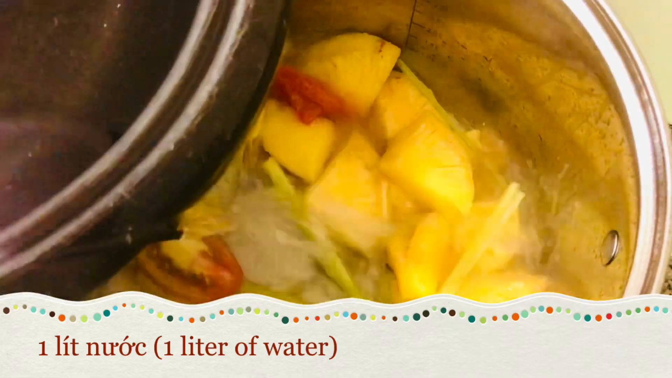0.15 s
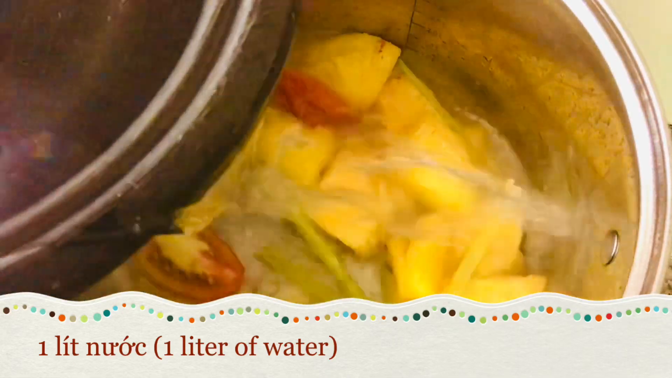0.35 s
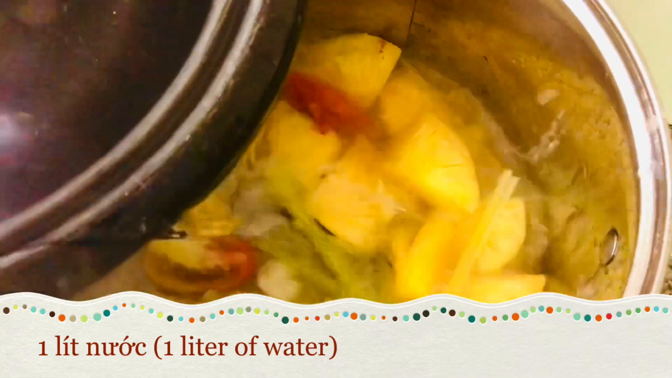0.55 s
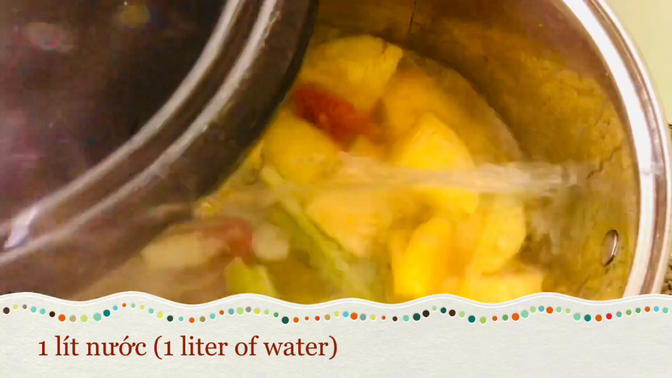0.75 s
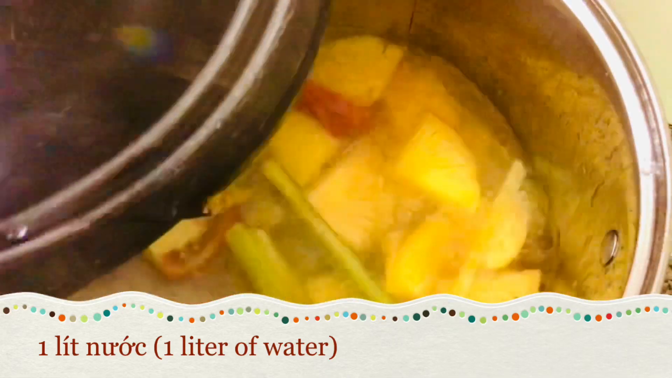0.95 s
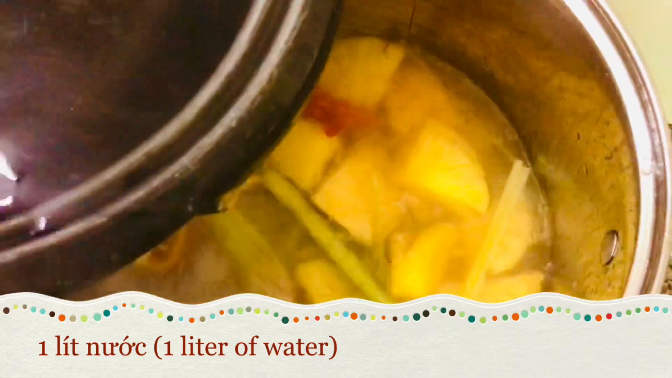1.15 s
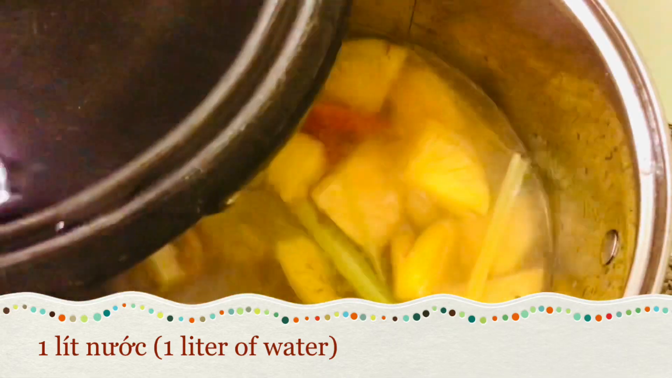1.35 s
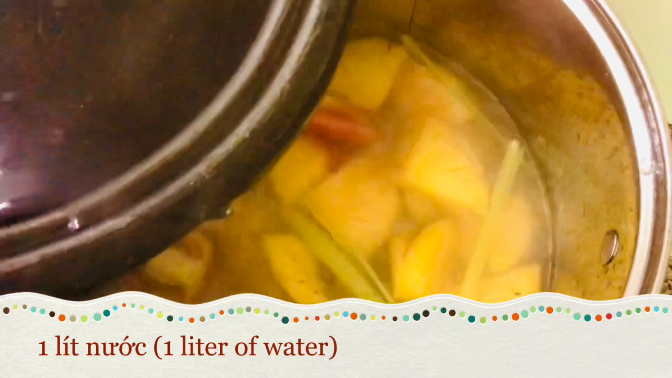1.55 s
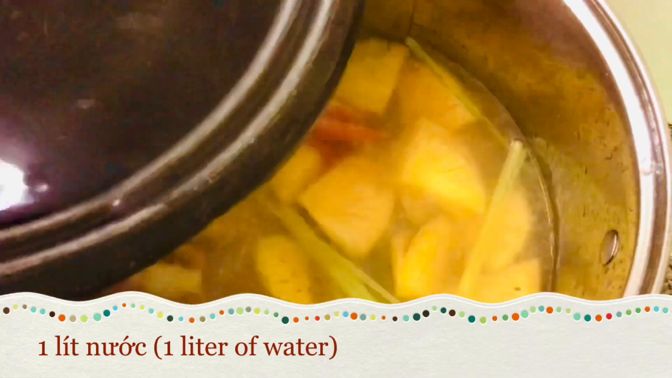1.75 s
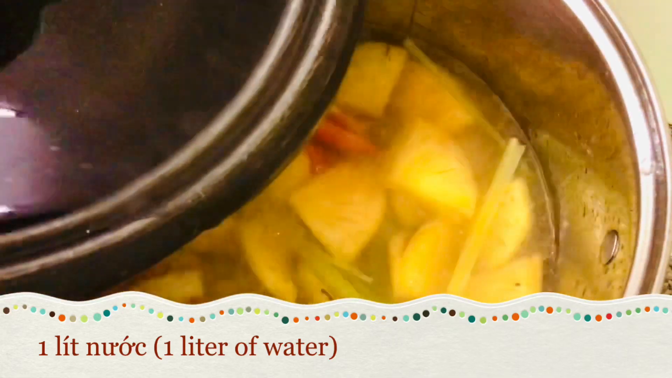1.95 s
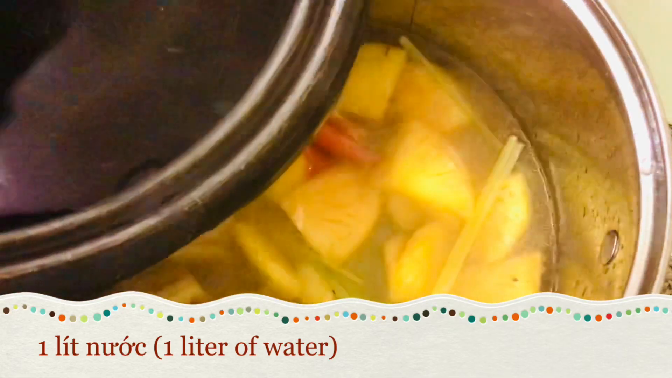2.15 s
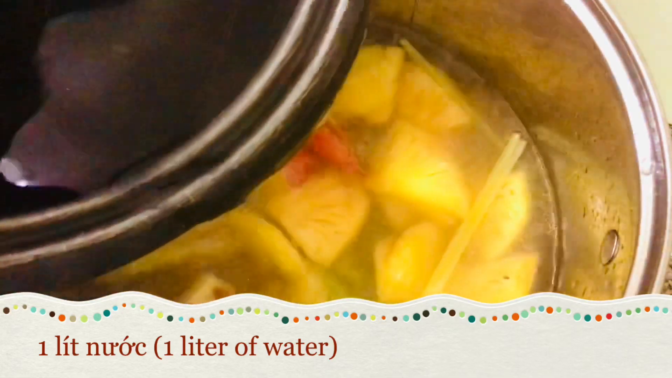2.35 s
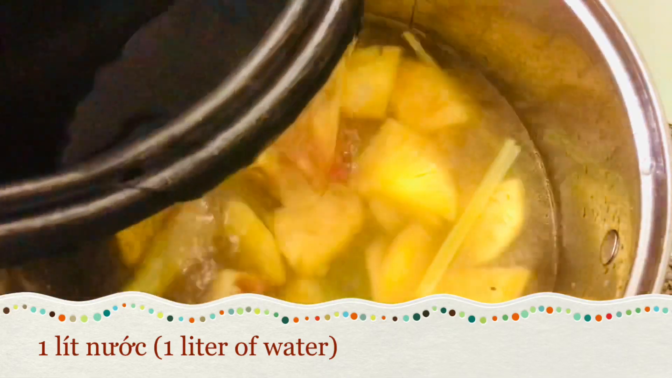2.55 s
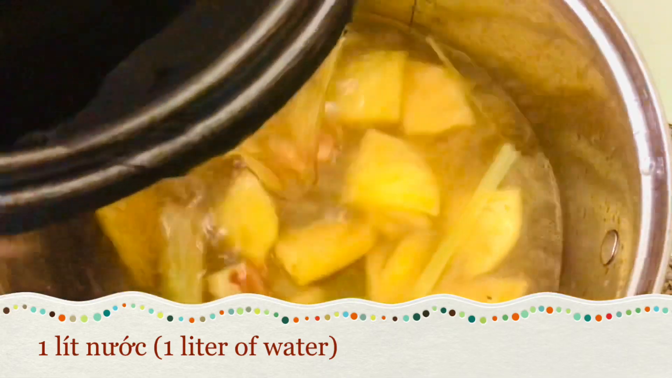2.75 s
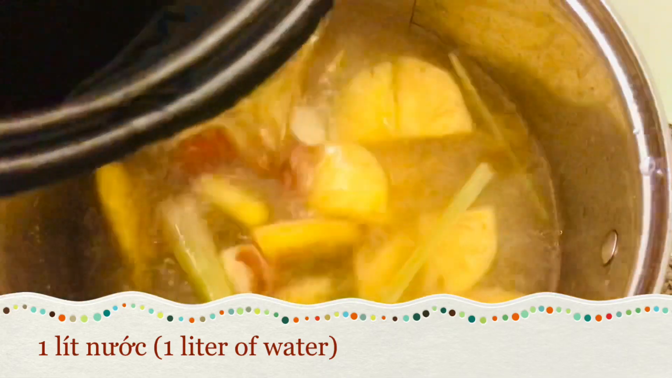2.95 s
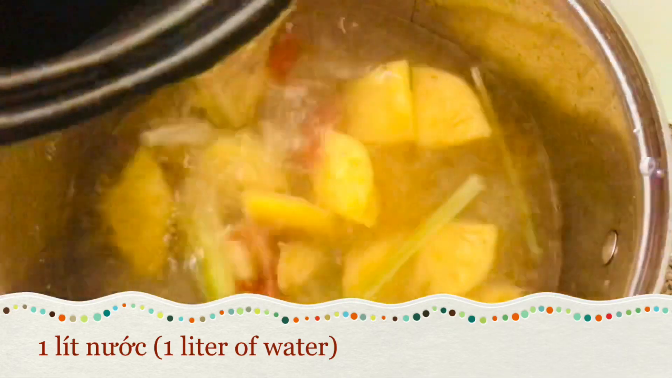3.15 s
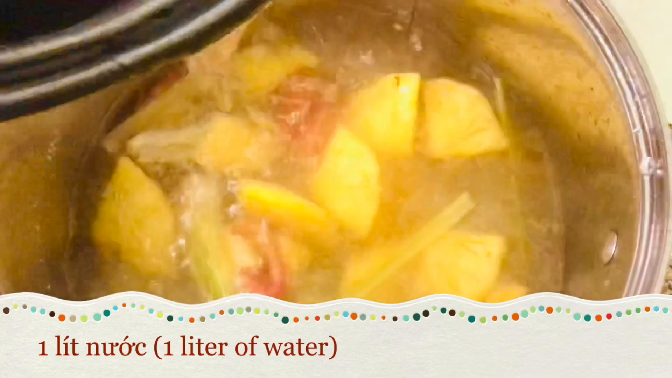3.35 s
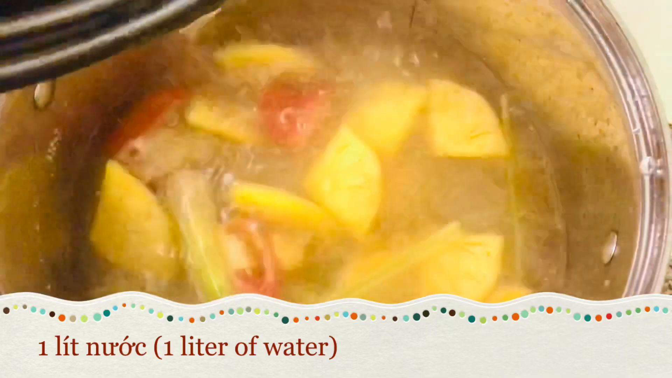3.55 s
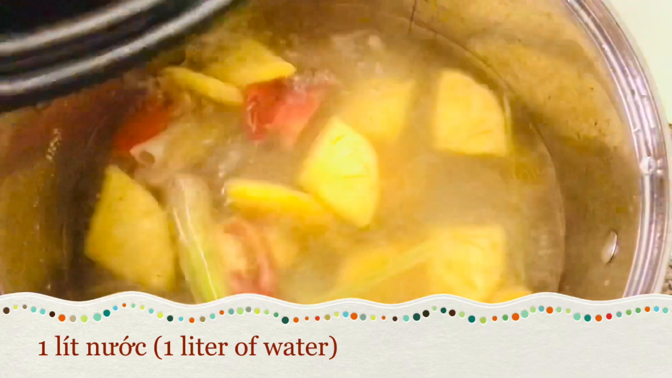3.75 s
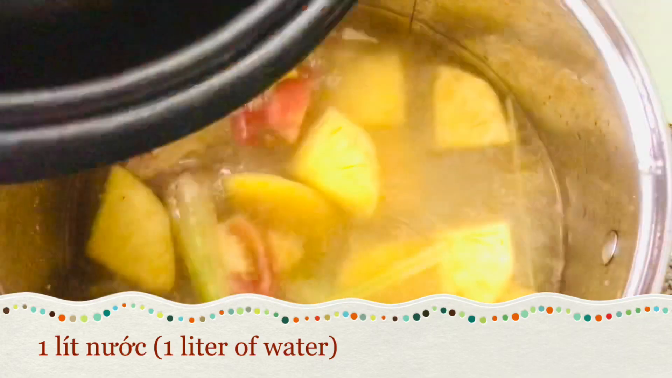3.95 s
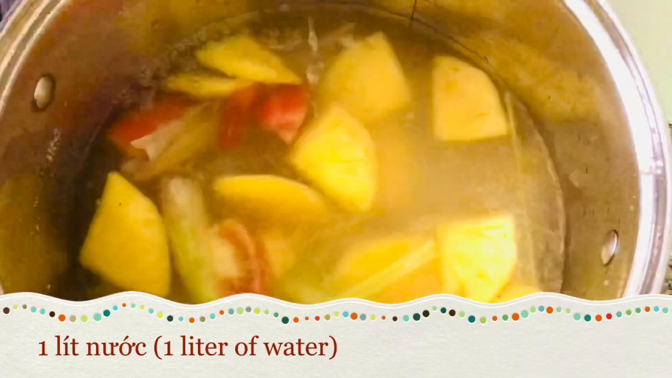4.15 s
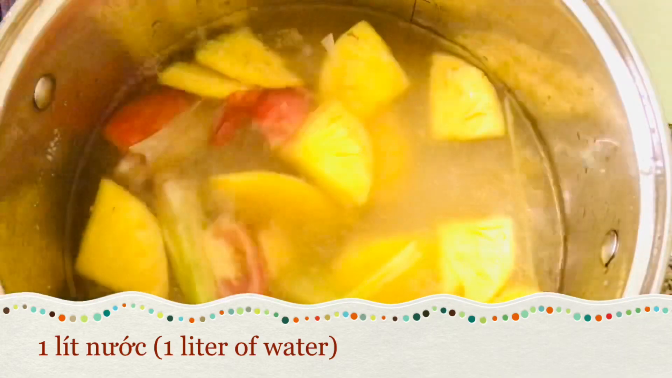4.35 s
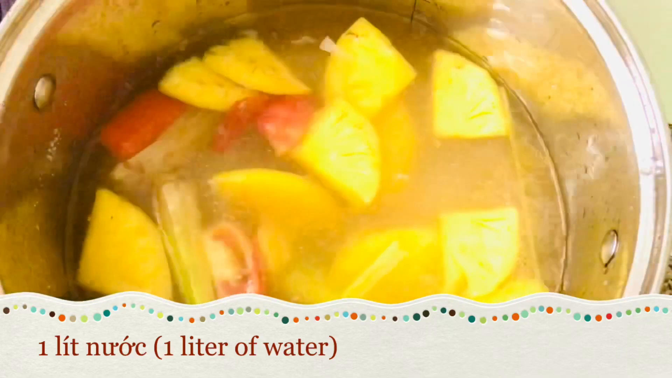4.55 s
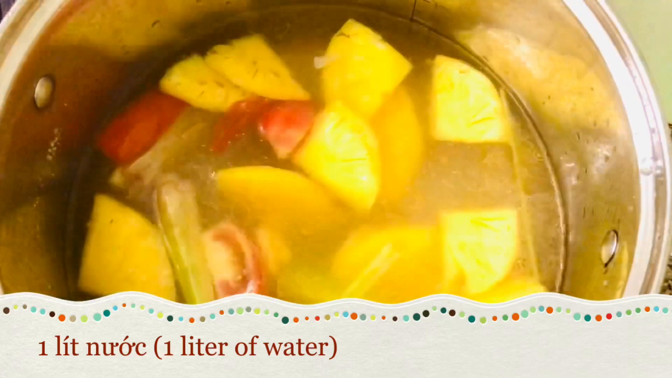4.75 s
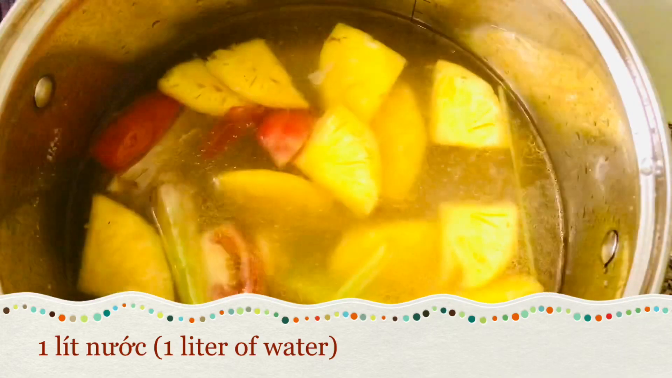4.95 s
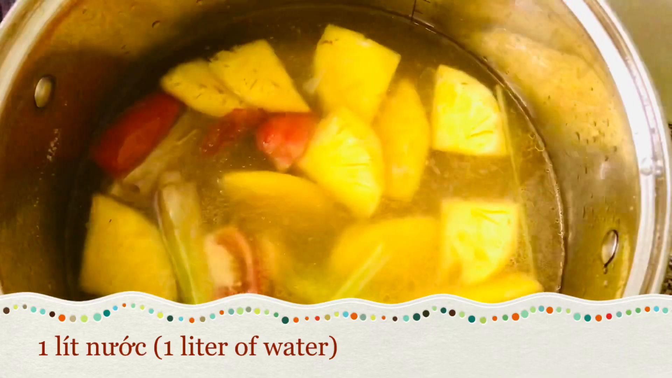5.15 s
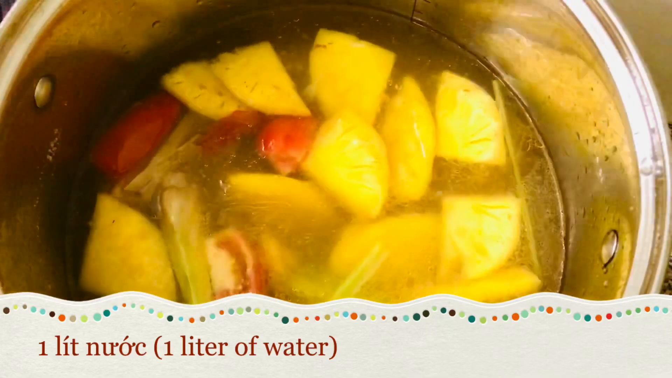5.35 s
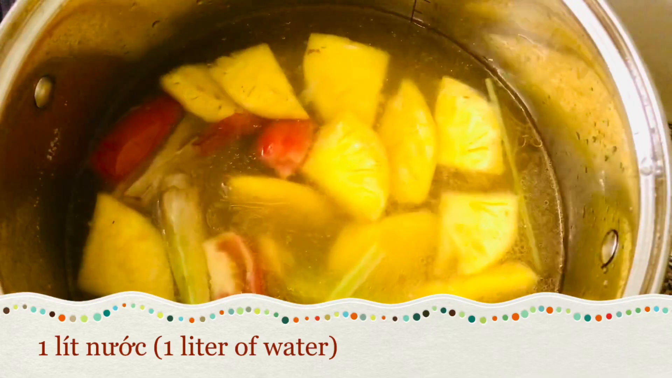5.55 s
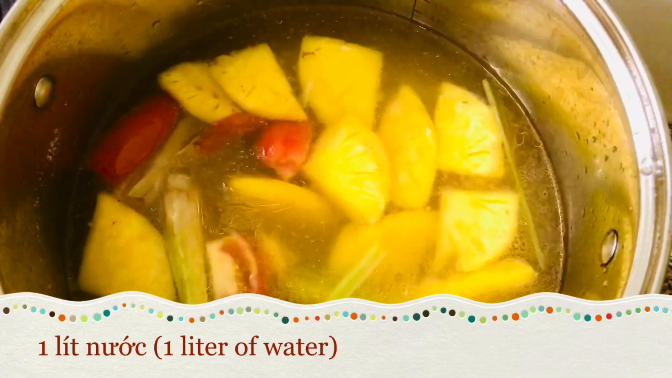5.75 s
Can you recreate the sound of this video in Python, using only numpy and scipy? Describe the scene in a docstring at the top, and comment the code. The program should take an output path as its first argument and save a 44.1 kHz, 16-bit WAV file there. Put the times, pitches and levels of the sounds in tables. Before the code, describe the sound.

A loud, surging sizzle of water hitting a hot steel pot fades into sputters over a faint gas burner rumble.

```python
"""A loud, surging hiss, overloading the single microphone at first: water poured onto vegetables frying
in a hot steel pot flashes to steam. The air in the pot resonates and hums higher as it fills, bubbles
ring with a plop and the last drops spit. Beneath it a gas burner rumbles and faintly whistles;
near the end a light object knocks and bounces close by."""
import sys
import numpy as np
from scipy import signal
from scipy.fft import rfft, irfft, next_fast_len
from scipy.io import wavfile
from scipy.ndimage import uniform_filter1d

SR = 44100
rng = np.random.default_rng(int(sys.argv[2]) if len(sys.argv) > 2 else 0)


def file_out(sig):
    """Save sig as 16-bit WAV at sys.argv[1]."""
    # one column per channel
    cols = np.atleast_2d(sig).T
    # limit, then scale
    lim = np.clip(cols, -1, 1)
    pcm = np.round(lim * 32767).astype(np.int16)
    wavfile.write(sys.argv[1], SR, pcm)


N = 259649


def amp(db):
    """Amplitude ratio of a level in decibels."""
    return 10 ** (np.asarray(db) / 20)


def unit(x):
    """Normalisation to an RMS of one."""
    return x / np.sqrt(np.mean(x ** 2) + 1e-20)


def power_sum(a_db, b_db):
    """Incoherent sounds add in power; their joint level in dB."""
    return 10 * np.log10(amp(2 * a_db) + amp(2 * b_db))


def along(points, hz, column=1):
    """Interpolation of one column on a logarithmic frequency axis."""
    table = np.transpose(points)
    return np.interp(np.log(hz + 1), np.log(table[0] + 1), table[column])


def curves(rows):
    """Linear interpolation in time: one curve for each column after the first."""
    times, *columns = np.transpose(rows)
    return [np.interp(np.arange(N) / SR, times, column) for column in columns]


def swells(rows, rise_s, fade_db_per_s):
    """Envelopes that rise, hold and fade add in power; one dB curve for each level column."""
    t = np.arange(N) / SR
    start, held, *columns = np.transpose(rows)[..., None]
    attack = np.clip((t - start) / rise_s, 1e-4, 1) ** 2
    fade = amp(-2 * fade_db_per_s * np.clip(t - start - rise_s - held, 0, 1))
    return [10 * np.log10(np.sum(attack * fade * amp(2 * db), axis=0)) for db in columns]


def filtered(x, response):
    """Linear filtering: the spectrum is multiplied by a frequency response."""
    size = next_fast_len(N + SR // 2)
    return irfft(rfft(x, size) * response(np.fft.rfftfreq(size, 1 / SR)), size)[..., :N]


def resonance(f, hz, width_hz):
    """Band-pass response of a damped oscillator."""
    return 1j * f * width_hz / (hz * hz - f * f + 1j * f * width_hz)


def peak(f, hz, width_hz, db):
    """Magnitude response of two like resonators in cascade."""
    return np.abs(amp(db) * resonance(f, hz, width_hz) ** 2)


def patchy_noise(bands, frames, depth_db):
    """Random modulation of white noise, in patches over time and frequency."""
    spectra = signal.stft(rng.standard_normal(N), nperseg=256)[2]
    field = uniform_filter1d(rng.standard_normal(spectra.shape), bands, axis=0)
    field = uniform_filter1d(field, frames, axis=1)
    return signal.istft(spectra * amp(depth_db * unit(field)), nperseg=256)[1][:N]


def kitchen():
    """Broadband ambient noise: the steady hush of the kitchen."""
    # Each row: frequency in Hz, relative spectral density in dB.
    spectrum = [(180, -30), (300, 0), (760, -5), (960, -0.5), (1360, -7), (1840, -9), (2150, -15),
                (3080, -15), (3950, -12), (5610, -22), (7080, -9.5), (7690, -21), (10400, -36),
                (13100, -26), (16000, -20)]
    noise = patchy_noise(bands=4, frames=12, depth_db=-0.5)
    return amp(-44) * unit(filtered(noise, lambda f: amp(along(spectrum, f))))


def burner():
    """Combustion noise rumbles, and the gas jet whistles unsteadily in a narrow band."""
    # The flame's strength. Each row: time in seconds, rumble in dB, whistle in dB.
    flame = [(0.0, -35, -43), (2.5, -32.5, -37.5), (4.2, -30, -47), (4.8, -31, -45.5), (5.89, -34, -46.5)]
    # The rumble. Each row: frequency in Hz, relative spectral density in dB.
    spectrum = [(20, -28), (32, -26), (42, -10), (100, -4.5), (150, -7), (240, -11.5), (290, -19),
                (400, -28), (600, -45)]
    # The flame's own tones. Each row: frequency in Hz, width in Hz, relative level in dB.
    throb = [(49, 8.6, -6), (69, 16, 0)]
    rumble_db, whistle_db = curves(flame)
    response = lambda f: amp(along(spectrum, f)) + sum(peak(f, *tone) for tone in throb)
    rumble = unit(filtered(rng.standard_normal(N), response))
    whistle = unit(filtered(rng.standard_normal(N), lambda f: resonance(f, hz=1857, width_hz=38)))
    return amp(rumble_db) * rumble + amp(whistle_db) * whistle


def room(x):
    """Reverberation: reflections from the walls die away at a rate that depends on frequency."""
    # Each row: frequency in Hz, reverberation time (60 dB) in seconds.
    decay_times = [(200, 0.44), (2000, 0.72), (6000, 0.84), (15000, 0.46)]
    hz, t, spectra = signal.stft(rng.standard_normal(SR // 2), SR, nperseg=256)
    decay = amp(-60 * t / along(decay_times, hz)[:, None])
    tail = signal.istft(spectra * decay, SR, nperseg=256)[1]
    return signal.fftconvolve(x, tail / np.linalg.norm(tail))[:N]


def knock():
    """Impact excitation: each contact cracks, rings the object's modes and leaves it chattering."""
    # Touch, blow and bounces. Each row: start in seconds, relative level in dB, ring share from 0 to 1.
    contacts = [(5.4794, -8, 0.2), (5.4804, 1.5, 0.82), (5.5098, -10.5, 0), (5.5296, -9.5, 0.05),
                (5.576, -13, 0.03), (5.579, -27, .15), (5.612, -27, 0.9)]
    # Each row: mode frequency in Hz, relative level in dB, seconds to decay by 60 dB.
    modes = [(680, 0, .016), (1230, -1, .016), (1430, -3, .016), (1660, -3, .016), (2050, -5, .012),
             (2850, -5, .024), (3500, -9, .012), (4330, -5, .016), (6600, -9, .012), (8800, -11, .018)]
    out, t = np.zeros(N + SR), np.arange(SR // 5) / SR
    for start, db, share in contacts:
        ring = sum((-1) ** k * amp(level + rng.normal(0, 0.65) - 60 * t / t60)
                   * np.sin(2 * np.pi * hz * t) for k, (hz, level, t60) in enumerate(modes))
        crack = amp(-60 * t / 0.026) * rng.standard_normal(len(t))
        chatter = amp(-60 * t / 0.12) * signal.lfilter([1], [1, -0.7], rng.standard_normal(len(t)))
        hit = share * (0.51 * ring + 0.083 * chatter) + (0.45 - 0.16 * share) * crack
        out[round(start * SR):][:len(t)] += amp(db) * hit
    # too small an object to radiate bass
    return filtered(out[:N], lambda f: (1j * f / (330 + 1j * f)) ** 2)


def gurgle(hum_db, count):
    """Air entrainment by the stream: rows of random bubbles near two of the pot's air modes."""
    when, softness, mode, detune = rng.random((count, 4)).T
    start = np.interp(when, [0, 1], (1.5, 3.75))
    db = hum_db[(start * SR).astype(int)] + 6.5 - 8 * softness
    hz = np.where(mode < 0.75, 573, 1104) * (1 + 0.16 * (detune - 0.5))
    return list(zip(start, db, hz))


def plops(hum_db):
    """Bubble resonance: each rings a few cycles, usually rising in pitch, with a wet slap."""
    # Each row: start in seconds, relative level in dB, pitch in Hz.
    bubbles = [(1.058, -14, 1100), (1.082, -5.5, 1080), (1.712, -6, 1770), (2.019, -11, 465),
               (2.04, -15, 343), (2.074, -17, 403), (2.255, -13.5, 1080), (2.634, -2.5, 1560),
               (2.663, 1, 2030), (2.734, -1, 1730), (2.807, -1, 2040), (2.843, -12, 583),
               (3.231, -11.5, 602), (3.345, -15, 600), (3.356, -12, 550), (3.482, -14.5, 560),
               (3.538, -13.5, 560), (3.857, -13.5, 512), (3.895, -8.5, 1024), (3.894, -14, 560),
               (3.95, -21, 540), (4.501, -20, 1130), (4.54, -21, 1130)]
    out, t = np.zeros(N + SR), np.arange(SR // 10) / SR
    f = np.fft.rfftfreq(len(t), 1 / SR)
    for start, db, hz in bubbles + gurgle(hum_db, count=50):
        life_s = 0.003 + 7.5 / hz
        tone = np.sin(2 * np.pi * hz * t * (0.968 + rng.uniform(-0.025, 0.21) * t / life_s))
        slap = unit(irfft(rfft(rng.standard_normal(len(t))) * resonance(f, 0.99 * hz, 0.39 * hz), len(t)))
        envelope = amp(db + 3 - 30 * t / life_s) * (1 - np.exp(-t / 0.0036))
        out[round(start * SR):][:len(t)] += envelope * (tone + 0.52 * slap)
    return out[:N]


def spatter(fizz_db, count, from_s=4.2):
    """A random point process: rows of small drops after the pour, louder where the fizz is."""
    when, softness, pitch, breadth = rng.random((count, 4)).T
    start = from_s + when * (N / SR - from_s)
    db = np.maximum(fizz_db[(start * SR).astype(int)] + 12, -40) - 6 * softness
    hz = np.interp(pitch, [0, 1], (6960, 14500))
    return list(zip(start, db, hz, 0.41 * breadth))


def spits(fizz_db):
    """A brief impulse has a wide spectrum: each bursting drop cracks in a band around its own pitch, and two
    bubbles burst with a broad slap at 1.148 s and 3.538 s."""
    # Each row: start in seconds, relative peak level in dB, centre in Hz, broadband share from 0 to 1.
    drops = [(0.5966, 10, 12900, 0.9), (0.93, -0.5, 12400, 0.1), (1.148, -2.5, 1510, 0.5),
             (1.2523, 0, 5700, 0.3), (1.773, 1, 12800, 0.3), (2.481, 0, 5700, 0.8), (3.538, -9, 910, 0.42),
             (3.8172, -12, 12700, 0.4), (3.9244, -9, 11700, 0.4), (4.0826, -10, 13300, 0),
             (4.1193, -14, 6000, 0.8), (4.1834, -10, 11900, 0.5), (4.215, -4, 14600, 0.8),
             (4.248, -6, 6500, 1), (4.3092, -10.5, 1690, 1), (4.372, -9.5, 13300, 0.3),
             (4.5411, -17, 1600, 1), (4.565, -14, 8300, 1), (4.8059, -12.5, 6900, 1),
             (4.8264, -17, 11000, 0.3), (4.8614, -18, 13600, 0.4), (4.888, -9.5, 11500, 0.57),
             (4.9851, -25, 4700, 0.8), (5.0459, -22, 12200, 0.5), (5.108, -17.5, 8800, 1),
             (5.1846, -23, 11400, 0.0), (5.237, -30, 3770, 0), (5.3877, -36, 4100, 0.1),
             (5.8202, -31, 4700, 0.1)]
    out, t = np.zeros(N + SR), np.arange(SR // 25) / SR
    f = np.fft.rfftfreq(len(t), 1 / SR)
    envelope = amp(-60 * t / 0.0094) + 0.22 * amp(-60 * t / 0.051)
    for start, db, hz, broad in drops + spatter(fizz_db, count=34):
        noise = rng.standard_normal(len(t)) * envelope
        band = resonance(f, hz, (0.38 + 0.89 * broad) * hz) ** 2 + broad ** 2 * resonance(f, 4700, 24000)
        crack = irfft(rfft(noise) * band, len(t))
        out[round(start * SR):][:len(t)] += amp(db + 1.5) * crack / np.abs(crack).max()
    return out[:N]


def froth(count, centre_hz, octaves, cycles):
    """Damped oscillation of many small bubbles, each falling 30 dB in the given number of cycles."""
    draws, k = rng.random((count, 2)), np.arange(700)
    hz = np.clip(centre_hz * 2 ** (octaves * rng.standard_normal(count)), 300, 15000)[:, None]
    size_db = 14 * draws[:, 1:]
    envelopes = amp(size_db - 30 * k * hz / (cycles * SR)) * np.minimum(k / 60, 1)
    tones = envelopes * np.sin(2 * np.pi * hz * k / SR)
    samples = (draws[:, :1] * N).astype(int) + k
    return unit(np.bincount(samples.ravel(), tones.ravel(), N + len(k))[:N])


def pot_air(drive, fill):
    """Cavity resonance: the lower modes rise as the water shortens the air column."""
    # Each row: frequency in Hz when empty and when full, width in Hz, gain in dB when empty and when full.
    modes = [(500, 614, 170, 1, 0), (1016, 1130, 150, 7.5, 5), (1647, 1654, 106, 5.5, 0),
             (2370, 1800, 860, -4.5, -10), (290, 450, 89, -12.5, -12)]
    # The spectrum between the modes, falling as the bare floor stops rattling.
    # Each row: frequency in Hz, gain in dB when empty and when full.
    slosh = [(150, -14, -27), (250, -8, -17.5), (380, -3.5, -31), (815, -3, -35), (1380, -2.5, -6),
             (2580, 1.5, -9.5), (2970, -13.5, -21.5)]
    hum = np.zeros(N)
    for level in np.linspace(0, 1, num=5):  # five water levels, cross-faded
        between = lambda f: amp((1 - level) * along(slosh, f) + level * along(slosh, f, column=2))
        modal_power = lambda f: sum(
            peak(f, hz + level * (full_hz - hz), width, db + level * (full_db - db)) ** 2
            for hz, full_hz, width, db, full_db in modes)
        weight = np.clip(1 - 4 * np.abs(fill - level), 0, 1)
        hum += weight * unit(filtered(drive, lambda f: np.sqrt(between(f) ** 2 + modal_power(f))))
    return hum


def steel_wall(spray, spectrum, fill):
    """Forced vibration: the wall's modes colour the spray's spectrum and change strength as it wets."""
    # Each row: mode frequency in Hz, width in Hz, gain in dB when dry and when wet.
    modes = [(2800, 150, 1, 4.5), (3420, 140, -1, 1.5), (4200, 150, 2.5, -7), (5235, 180, -5, 4),
             (5870, 100, -0.5, -4), (6480, 290, -0.5, 2), (8600, 130, 4, 1), (12600, 250, -1, 0)]
    wetness = np.clip(fill / 0.65, 0, 1)
    ringing = lambda f: np.sqrt(1 + sum(
        peak(f, hz, width, [[dry_db], [wet_db]]) ** 2 for hz, width, dry_db, wet_db in modes))
    dry_wall, wet_wall = unit(filtered(spray, lambda f: amp(along(spectrum, f)) * ringing(f)))
    return (1 - wetness) * dry_wall + wetness * wet_wall


def steam_vents(jets):
    """Resonant filtering of the jet noise: steam escapes in short whistles."""
    # Each row: start in seconds, hold in seconds, level in dB.
    vents = [(.04, 0.044, -19), (.34, .12, -18.5), (1.05, 0.058, -18), (1.25, 0.063, -16),
             (1.9, 0.034, -23), (2.46, 0.26, -22), (2.8, 0.13, -31), (3.125, 0.043, -19.5),
             (3.22, 0.13, -35), (3.87, 0.032, -26)]
    level_db, = swells(vents, rise_s=0.01, fade_db_per_s=254)
    return amp(level_db) * unit(filtered(jets, lambda f: resonance(f, hz=6170, width_hz=1070)))


def bursts(count, range_db, decay_s):
    """Shot noise: the envelope of steam bursts that start at once, decay and add in power."""
    when, strength = rng.random((count, 2)).T
    power = np.bincount((when * N).astype(int), amp(2 * range_db * strength ** 2), N)
    retained = np.exp(-2 / (decay_s * SR))
    return unit(np.sqrt(signal.lfilter([1], [1, -retained], power)))


def boil_levels():
    """Power addition of the pour and the late waves: levels of hum, splash and fizz in dB."""
    # The pour boiling off. Each row: time in seconds, then fizz, splash over fizz and hum in dB.
    pour = [(0, -7.5, -2, -10.5), (.08, -6, -6.5, -11), (.19, -12.5, -0.5, -13.5), (.29, -7, -4.5, -13),
            (.55, -12, -3, -15.5), (.77, -11, -2, -16), (.9, -15.5, -1, -19), (.96, -13, -1.5, -20),
            (1.15, -11.5, -3, -21.5), (1.2, -19, 2.5, -23.5), (1.3, -15.5, -0.5, -25),
            (1.65, -16, -2, -25.5), (1.75, -19.5, -1, -31), (1.79, -16.5, 0, -26.5), (1.88, -16.5, -4, -28),
            (1.93, -11.5, -7, -27), (2.05, -18.5, -2, -26.5), (2.27, -13.5, -5, -27.5),
            (2.39, -18.5, -5, -29.5), (2.49, -11.5, -7.5, -23.5), (2.65, -12, -5, -25),
            (2.77, -16.5, -3, -25), (2.88, -10, -6, -24), (3.11, -19, -5, -26.5), (3.2, -13, -4.5, -23.5),
            (3.29, -13, -6.5, -25.5), (3.36, -11, -5, -21.5), (3.55, -14.5, -7.5, -23.5),
            (3.72, -15, -7, -24.5), (3.8, -25, -8, -35), (3.95, -38.5, 3.5, -42), (5.89, -87, -7, -59)]
    # Waves washing up the hot wall. Each row: start and hold in seconds, then the same three levels.
    late_waves = [(3.858, 0.042, -16, -6.5, -26.5), (4.095, .07, -28, -5.5, -35),
                  (4.18, 0.067, -22, -7.5, -33), (4.375, 0.11, -38, -3.5, -38),
                  (4.49, 0.066, -37.5, -3.5, -38.5), (4.755, 0.13, -36.5, -5.5, -44),
                  (4.95, 0.025, -35, -7.5, -47), (4.98, 0.066, -36, -4, -44)]
    fizz_db, over_db, hum_db = curves(pour)
    waves = [(start, held, fizz, fizz + over, hum) for start, held, fizz, over, hum in late_waves]
    wave_fizz, wave_splash, wave_hum = swells(waves, rise_s=0.012, fade_db_per_s=166)
    splash_db = power_sum(fizz_db + over_db, wave_splash)
    return power_sum(hum_db, wave_hum), splash_db, power_sum(fizz_db, wave_fizz)


def boil(hum_db, splash_db, fizz_db):
    """Flash boiling: one crowd of steam bursts drives the splash, jets, fizz and air in the pot."""
    # Each row: time in seconds, water level from 0 (empty) to 1 (full).
    water_level = [(0, 0.042), (2, 0.59), (3.7, 0.92), (5.89, 1)]
    # Three spectra of the spray. Each row: frequency in Hz, relative spectral density in dB.
    splash_spectrum = [(1410, -25), (2400, -7), (2800, -1), (3380, 1), (4500, 2), (4900, -2.5), (5300, -4),
                       (6760, -7), (11400, -120)]
    jet_spectrum = [(2760, -42), (4850, 0), (5150, 0.5), (5700, 3), (6400, 1), (6900, 3.5), (7520, -9),
                    (8000, -12), (10400, -18), (17600, -120)]
    fizz_spectrum = [(4350, -24.5), (7400, -4.5), (9430, -1), (10400, -6.5), (11200, -1.5), (13100, -1.5),
                     (15100, -1.5), (16000, -6)]
    fill, = curves(water_level)
    surge = bursts(count=500, range_db=3.5, decay_s=0.024)
    # as the boil thins out, single bursts stand clear of the crowd
    prominence = 1.5 + 3 * np.clip((-18.5 - fizz_db) / 12, 0, 1)
    crackle = prominence * bursts(count=900, range_db=16, decay_s=0.0015)

    def drive(surging, crackling, depth_db):
        """Amplitude modulation of noise by the shared bursts."""
        envelope = 1 + surging * surge + crackling * crackle
        return envelope * patchy_noise(bands=5, frames=6, depth_db=depth_db)

    splash = unit(drive(surging=0.11, crackling=0.18, depth_db=1.96))
    splash += 0.15 * froth(count=2500, centre_hz=3659, octaves=0.36, cycles=57)
    splash = steel_wall(splash, splash_spectrum, fill)
    jets = unit(drive(surging=0.23, crackling=0.24, depth_db=0.6))
    jets += 0.14 * froth(count=2500, centre_hz=6226, octaves=0.202, cycles=380)
    jets = steel_wall(jets, jet_spectrum, fill)
    fizz = steel_wall(drive(surging=0.48, crackling=0.15, depth_db=1.06), fizz_spectrum, fill)
    hum = pot_air(drive(surging=0.25, crackling=0.15, depth_db=1.54), fill)
    hiss = amp(splash_db) * (splash + amp(-0.5) * jets) + steam_vents(jets)
    return amp(hum_db) * hum + hiss + amp(fizz_db) * fizz


def scene():
    """Superposition of direct and reverberant sound at one microphone, alike in both channels."""
    hum_db, splash_db, fizz_db = boil_levels()
    hits = knock()
    drops = spits(fizz_db) + plops(hum_db)
    steam = boil(hum_db, splash_db, fizz_db)
    direct = steam + drops + hits + burner() + kitchen()
    mono = direct + room(amp(-11) * hits + amp(-9) * drops + amp(-13.5) * steam)
    return np.array([mono, mono])


def record(dry):
    """Hard clipping and band limiting: the loudest hiss overloads the input, and the top treble is cut."""
    top_hz, slope_hz = 15900, 150
    clipped = np.clip(dry, -1, 1)
    return filtered(clipped, lambda hz: np.clip((top_hz - hz) / slope_hz, 0, 1))


dry = scene()
out = record(dry)
file_out(out)
```